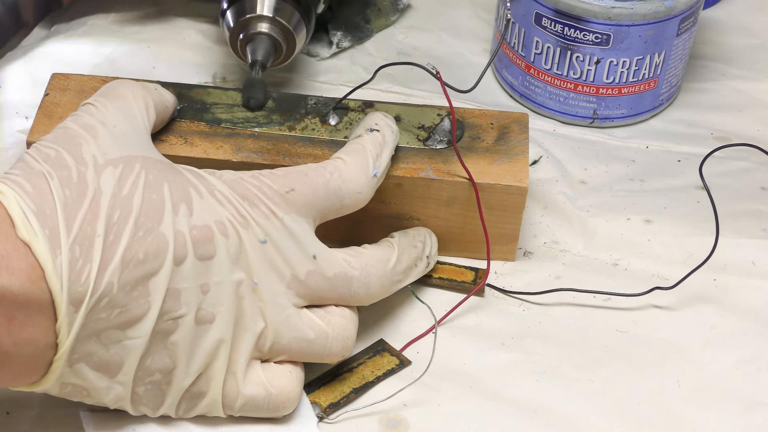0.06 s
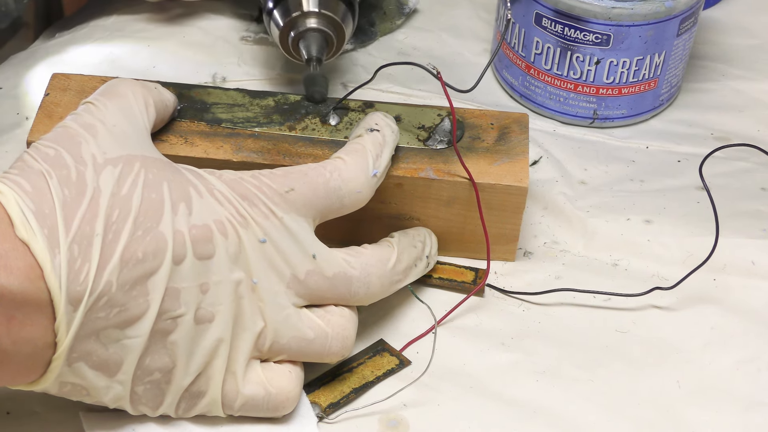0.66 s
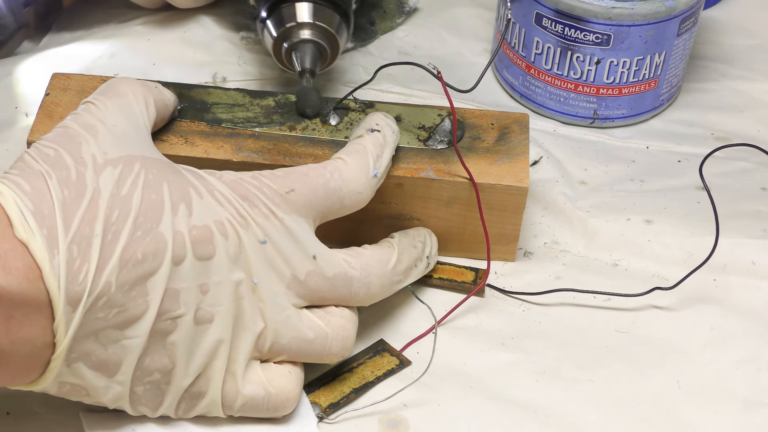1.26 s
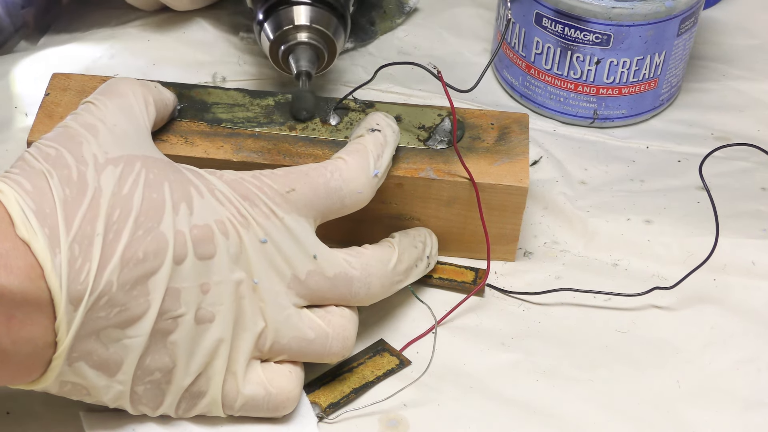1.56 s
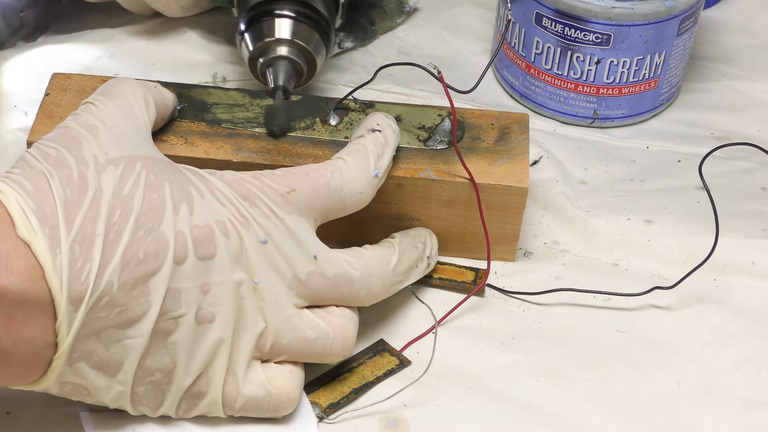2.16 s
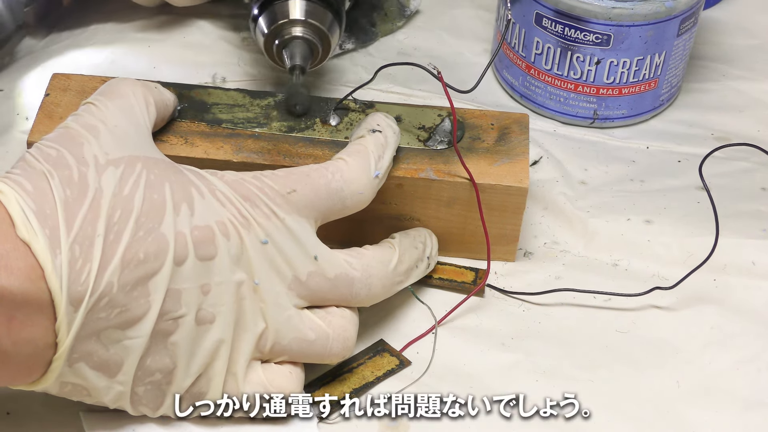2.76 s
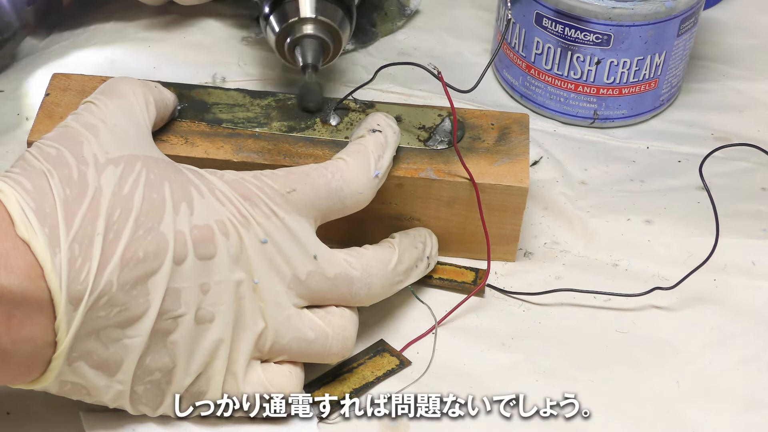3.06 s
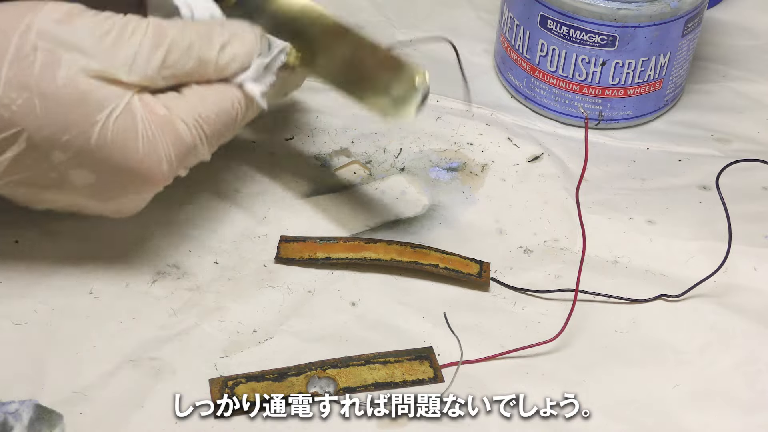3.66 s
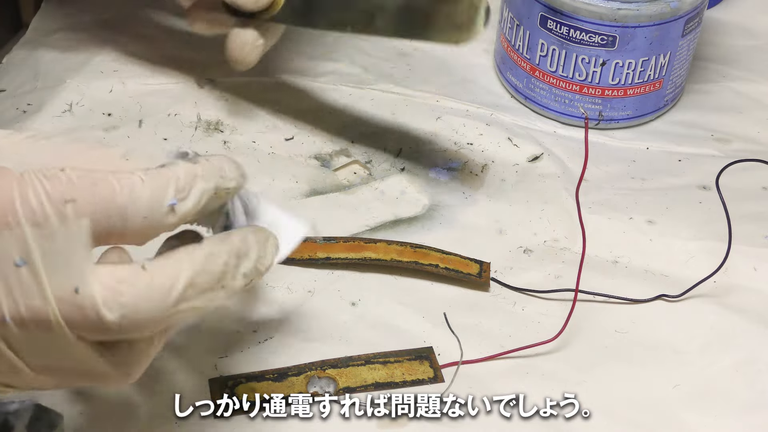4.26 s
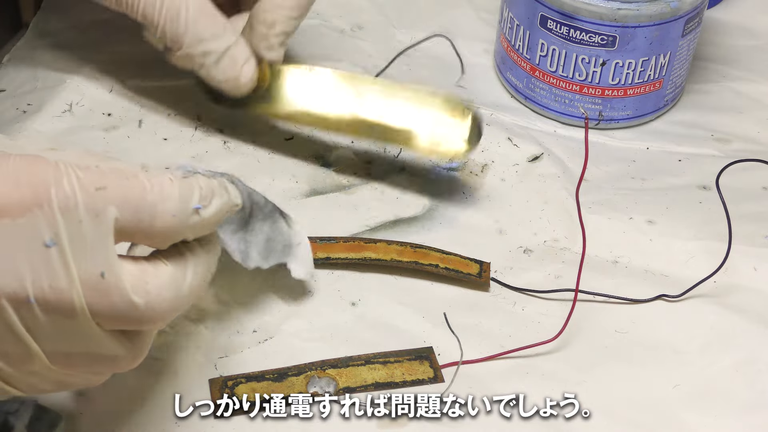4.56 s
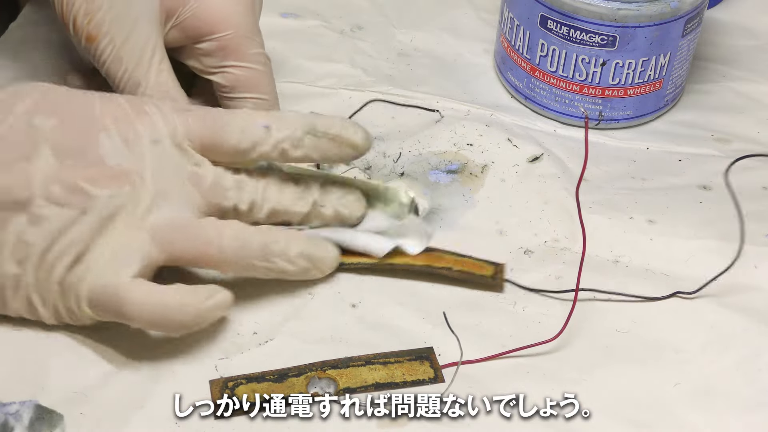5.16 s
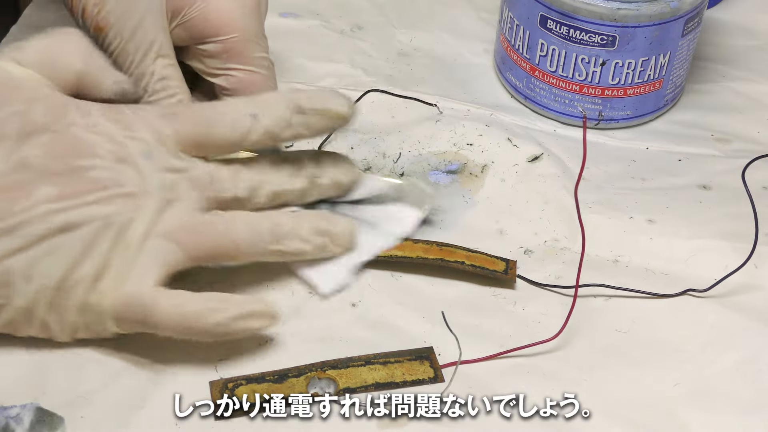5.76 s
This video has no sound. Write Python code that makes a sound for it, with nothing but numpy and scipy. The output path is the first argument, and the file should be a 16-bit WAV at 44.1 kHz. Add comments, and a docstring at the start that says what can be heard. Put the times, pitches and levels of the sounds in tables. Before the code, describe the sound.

From the start, a hand-held rotary tool runs close by, polishing a small metal plate. A steady motor hum and high whine sit over rushing air and the bright hiss of the polishing tip, with a thin, very high whistle flickering in and out. The pitch sags slightly from about 1 second as the tool takes load, and the tip drags with a faint low drone near 2.2 seconds. At about 3.15 seconds the tool cuts off abruptly, leaving quiet workshop background noise. Faint, short cloth wipes and rubbery scuffs follow at uneven intervals, busiest between 4.1 and 5.5 seconds. Sticky rubber gloves let go with small, sharp pops and crackles, clearest around 4.1, 4.6 to 4.7, 5.05 and 5.65 seconds. A soft low rumble of a passing hand swells around 5.8 seconds, and one last wipe with little snaps comes near 6 seconds.

```python
"""Polishing and wiping a metal plate

A geared hand-held rotary tool spins a polishing bob on a small plate: tones locked to the rotor whine
over the rush of cooling air. The tool sound ends abruptly, leaving a quiet workshop where gloved hands
pick up the plate and wipe it with a cloth: friction scuffs, rubber snaps and a low rumble of handling."""
import sys
import numpy as np
from scipy import signal
from scipy.fft import rfft, irfft
from scipy.io import wavfile

SR = 44100
rng = np.random.default_rng(int(sys.argv[2]) if len(sys.argv) > 2 else 0)


def put_to_file(sound):
    """Save the sound as 16-bit audio at rate SR, in the file named by the first command-line argument."""
    columns = np.atleast_2d(sound).T  # one column per channel
    safe = np.clip(columns, -1, 1)
    whole_steps = np.round(safe * 32767)
    wavfile.write(sys.argv[1], SR, whole_steps.astype(np.int16))


N = 264580
TIME = np.arange(N) / SR
BIN_HZ = np.maximum(np.arange(N // 2 + 1) * SR / N, 1)
TOOL_ENDS_S = 3.1502

# Motor speed, sagging under load. Each row: time in seconds, turns per second.
MOTOR_SPEED = [(0, 495.1), (.3, 494), (.57, 493.9), (.72, 492.9), (1.05, 492.3), (1.2, 486.2), (1.4, 483.6),
               (1.75, 480.3), (2.4, 480.2), (2.85, 478.4), (3.14, 478.1)]
# The whine and its octave. Each row: time in seconds, level in dB.
WHINE_LEVEL = [(0, -49.5), (.6, -57.5), (1.02, -56), (1.12, -49.5), (1.4, -50), (1.55, -56.5), (1.8, -51.5),
               (3.14, -52)]
OCTAVE_LEVEL = [(0, -56.5), (.6, -55.5), (.8, -53.5), (1.02, -55.5), (1.12, -52), (2.35, -54), (2.6, -60),
                (2.82, -52.5), (3.14, -55.5)]
# Spells of thin whistling. Each row: start and end in seconds, level in dB, flicker in dB.
WHISTLE_SPELLS = [(-.05, .09, -57, 2), (.3, 1.08, -57, 0), (1.17, 2.48, -60.5, 2.5), (2.48, 2.78, -55.5, 1),
                  (2.78, 3.2, -52.5, 1.8)]
# Weak partials of motor and chuck. Each row: multiple of that part's speed, base level in dB.
MOTOR_PARTIALS = [(9.75, -74), (10.4, -71), (11.4, -78), (12, -69), (16, -69.5), (16.7, -69), (20, -67),
                  (24, -73), (24.94, -73), (28.82, -84)]
CHUCK_PARTIALS = [(2, -102), (3, -82), (4, -82), (6, -79), (7, -84.5), (8, -85.5), (10, -91)]
# Hiss of the pressed bob. Each row: time in seconds, level in dB.
BOB_LEVEL = [(0, -52), (.3, -54), (1.05, -51.5), (1.25, -55.5), (1.9, -52.3), (2.4, -53.5), (2.6, -51),
             (2.87, -50), (3.12, -53.5)]
# The bob drags. Each row: centre in seconds, level in dB, half length in seconds.
BOB_DRAGS = [(.94, -75, .07), (2.219, -58.5, 0.037), (2.434, -65.5, .04)]
# Wipes. Each row: peak time in seconds, cloth hiss in dB, nominal half length in seconds, rasp in dB.
WIPES = [(3.183, -73, .006, -75.5), (3.555, -78, .03, -82), (3.72, -71, .021, -79), (4.155, -65, .012, -65),
         (4.354, -67.5, .017, -74), (4.673, -68, .024, -68), (4.837, -66, .02, -63.5),
         (4.945, -74, .025, -65), (5.069, -74, .019, -65), (5.17, -73, .022, -63), (5.231, -64, .017, -58),
         (5.362, -70.5, .055, -72), (5.515, -69, .03, -67), (5.833, -70.5, .034, -71),
         (5.98, -61, .023, -60.5)]
# Sticky gloves leave the plate. Each row: start in seconds, pop level in dB, pop pitch in Hz,
# crackle base level in dB, crackle pitch in Hz.
GLOVE_SNAPS = [(4.102, -44, 2270, -56, 8500), (4.1585, -55, 1950, -52, 10400),
               (4.4137, -60, 2190, -65, 7500), (4.6205, -46, 2500, -63, 10000),
               (4.6503, -39.5, 2000, -65, 11500), (4.703, -40.5, 2010, -58, 10300),
               (4.8554, -48, 1900, -74, 9000), (4.9156, -53, 2030, -56.5, 9400),
               (5.051, -42.5, 2450, -76, 6000), (5.07, -46, 2800, -71, 7000),
               (5.224, -51, 2800, -53, 12800), (5.292, -55, 1770, -62.5, 9500),
               (5.6508, -38, 2780, -65, 10500), (5.972, -51, 1950, -58, 7500),
               (5.9904, -50, 2180, -54, 9500)]
# Rumble of the passing hand. Each row: time in seconds, level in dB.
RUMBLE_LEVEL = [(5.70, -95), (5.742, -55), (5.785, -51), (5.83, -57), (5.86, -52), (5.895, -50.5),
                (5.92, -72), (6, -64)]

# Noise spectra. Each row: frequency in Hz, relative spectral density in dB.
COOLING_SPECTRUM = [(30, -31), (100, -15), (320, -16), (500, -10), (820, -8.5), (1050, 0), (1700, 1.5),
                    (2900, -2), (4400, -1.5), (5300, -12), (6300, -4), (7500, -8.5), (12000, -6),
                    (13700, -13.5)]
BOB_SPECTRUM = [(500, -31), (1500, -13), (3000, -5), (4500, 2), (6200, 1.5), (7500, -0.5), (11500, 1),
                (13000, -0.5), (13700, -6.5), (16000, -4)]
BLOCK_SPECTRUM = [(60, -30), (135, -13), (180, 4.5), (220, -3.5), (280, -6), (360, -18), (700, -50)]
WORKSHOP_SPECTRUM = [(25, -24), (50, -23), (70, -10.5), (170, -8.5), (260, -2.5), (400, -4), (600, -9.5),
                     (780, -11.5), (1100, -6.5), (2200, -9.5), (3200, -13.5), (5000, -29), (11000, -36.5),
                     (16000, -47)]
CLOTH_SPECTRUM = [(300, -29), (1500, 1), (2500, 3), (4700, 2), (6000, -1.5), (8000, -3), (10800, 3.5),
                  (13000, 0.5), (16000, -9)]
GLOVE_SPECTRUM = [(300, -21), (1200, -12), (2100, -2), (2800, -7.5), (4000, -14), (8000, -27), (16000, -47)]
RUMBLE_SPECTRUM = [(20, -10), (50, -9), (80, 3.5), (120, 1.5), (250, -7.5), (400, -27), (900, -40),
                   (3000, -70)]
# Resonances. Each row: centre in Hz, bandwidth in Hz, lift in dB.
HOUSING_MODES = [(446.6, 19, 9.5), (717, 53, 7), (1403, 63, 9), (1564, 74, 10.5), (2404, 220, 6),
                 (2603, 21, 11), (3970, 560, 4), (4980, 54, 10.5), (6140, 140, 4.5), (6780, 110, 5)]
WORKSHOP_MODES = [(70, 15, 5), (97.5, 19, 11.5), (145, 27, 13.5), (232.5, 49, 8), (385, 48, 3),
                  (1220, 130, 0.5)]
PLATE_MODES = [(2030, 160, 4), (2660, 160, 3), (4590, 90, 4), (10600, 900, 0.5)]
# Stereo width of the first part as heard, narrowing to mono near 7.5 kHz.
# Each row: frequency in Hz, side minus mid in dB, left minus right in dB.
FIRST_PART_STEREO = [(60, 3, -9), (200, -7, -3.5), (380, -10.5, -1), (1000, -12, -0.5), (2400, -14.5, -1),
                     (4700, -9, 0.3), (7500, -44, -0.5), (11700, -10.5, .5)]
# Stereo width of the second part as heard, with the same columns.
ROOM_STEREO = [(100, -16, -2.5), (380, -13, 0), (1300, -9, 3), (2400, -7.5, 1.5), (8000, -15, .3)]
HAND_STEREO = [(60, 2.5, -2), (400, -2, -1)]


def from_db(db):
    """Amplitude grows tenfold for every 20 dB."""
    return 10 ** (np.asarray(db) / 20)


def unit_rms(x):
    """Normalisation to unit mean power."""
    return x / np.sqrt(np.mean(x ** 2) + 1e-20)


def over_time(rows):
    """Linear interpolation of a curve at every sample."""
    return np.interp(TIME, *np.transpose(rows))


def over_bins(hz, db):
    """Interpolation of a spectrum in log frequency."""
    return np.interp(np.log(BIN_HZ), np.log(hz), db)


def drift(corner_hz):
    """Random fluctuation: low-passed noise of unit rms."""
    return unit_rms(irfft(rfft(rng.standard_normal(N)) / (1 + (BIN_HZ / corner_hz) ** 2), N))


def swell(centre_s, half_s):
    """A Gaussian envelope whose half length is one standard deviation."""
    return np.exp(-.5 * ((TIME - centre_s) / half_s) ** 2)


def pan(db):
    """Channel gains for a level difference, left minus right."""
    return from_db(db / 2 * np.array([[1], [-1]]))


def noise(spectrum, image, modes=(), grain_db=0):
    """Source and filter: resonances colour stereo noise of unit rms; grain breaks it into tiny slips."""
    lift_db = sum(db / (1 + (2 * (BIN_HZ - hz) / width) ** 2) for hz, width, db in modes)
    colour = from_db(over_bins(*np.transpose(spectrum)) + lift_db)
    slips = rng.standard_normal((2, N)) * from_db(grain_db * np.clip(drift(330), -2.5, 2.5))
    mid, side = rfft(slips) * colour
    image_hz, side_db, left_db = np.transpose(image)
    side *= from_db(over_bins(image_hz, side_db))
    balance = pan(over_bins(image_hz, left_db))
    return unit_rms(irfft(np.array([mid + side, mid - side]) * balance, N))


def tone(phase, db, flutter_db=0, spread_rad=.3, rough_rad=.1):
    """Phase modulation: roughness smears a partial, and reflections shift it between the ears."""
    ear_shift = spread_rad * drift(1.8) * np.array([[1], [-1]])
    wobble = rough_rad * drift(60) + rng.uniform(0, 2 * np.pi)
    return np.sqrt(2) * from_db(db + flutter_db * drift(6.7)) * np.sin(phase + ear_shift + wobble)


def motor_hum(angle, load):
    """Rotor unbalance forces one vibration per turn, weaker under load."""
    return tone(angle, -60.5 - 7 * load, flutter_db=.2, spread_rad=.36, rough_rad=.044)


def motor_whine(angle, load):
    """Harmonics 4 and 8 of the rotation, smeared by rotor rattle that steadies under load."""
    rattle = .2 - .133 * load
    whine = tone(4 * angle, over_time(WHINE_LEVEL), flutter_db=.7, spread_rad=.28, rough_rad=rattle)
    octave = tone(8 * angle, over_time(OCTAVE_LEVEL), flutter_db=.9, spread_rad=.091, rough_rad=2 * rattle)
    return whine * pan(1.5) + octave


def motor_whistle(angle, fade_s=.04):
    """Harmonic 25 of the rotation sounds in flickering, soft-edged spells."""
    flicker, envelope = drift(13), np.zeros(N)
    for start, end, db, flicker_db in WHISTLE_SPELLS:
        spell = np.clip(np.minimum(TIME - start, end - TIME) / fade_s + .5, 0, 1)
        envelope += spell * from_db(db + flicker_db * flicker)
    return envelope * tone(25 * angle, 0, spread_rad=.2, rough_rad=.13)


def motor_overtones(angle, flutter_db=3.4):
    """Weak partials are phase-locked to the rotor while their levels flutter independently."""
    return sum(np.sqrt(2) * from_db(db + flutter_db * drift(12)) * np.sin(order * angle)
               for order, db in MOTOR_PARTIALS)


def chuck_shake(angle, load, gear_ratio=17.3):
    """Forced vibration: the geared-down chuck shakes the tool at its harmonics, less under load."""
    shake = np.zeros((2, N))
    for order, db in CHUCK_PARTIALS:
        ear_phase = rng.normal(0, .47, (2, 1))
        shake += np.sqrt(2) * from_db(db) * np.sin(order * angle / gear_ratio + ear_phase)
    return from_db(-1.5 * load + 1.6 * drift(5.1)) * shake * pan(-5.5)


def motor():
    """The rotor angle, the integral of speed, sets the phase of every tool tone."""
    speed = over_time(MOTOR_SPEED)
    load = (speed.max() - speed) / np.ptp(speed)   # 0 running light, 1 at full load
    angle = 2 * np.pi * np.cumsum(speed + .22 * drift(27.6)) / SR
    return (motor_hum(angle, load) + motor_whine(angle, load) + motor_whistle(angle)
            + motor_overtones(angle) + chuck_shake(angle, load))


def cooling_air(db=-47):
    """Broadband flow noise is coloured by the resonances of the housing."""
    return from_db(db) * noise(COOLING_SPECTRUM, FIRST_PART_STEREO, HOUSING_MODES)


def bob_hiss(wander_db=.5):
    """Sliding friction hisses with the pressure of a slightly unsteady hand."""
    level_db = over_time(BOB_LEVEL) + wander_db * drift(4)
    return from_db(level_db) * noise(BOB_SPECTRUM, FIRST_PART_STEREO, grain_db=1)


def block_drone():
    """The dragging bob excites a low resonance of the wooden block under the plate."""
    drag = sum(from_db(db) * swell(s, half_s) for s, db, half_s in BOB_DRAGS)
    return drag * noise(BLOCK_SPECTRUM, FIRST_PART_STEREO)


def workshop(db=-62):
    """Room modes colour a steady background noise."""
    return from_db(db) * noise(WORKSHOP_SPECTRUM, ROOM_STEREO, WORKSHOP_MODES)


def stroke(peak_s, half_s):
    """An asymmetric envelope: a wipe starts quickly and trails off."""
    return swell(peak_s, half_s * np.where(TIME < peak_s, .75, 1.2))


def cloth_hiss(catch_db=1.8):
    """Stick-slip friction: fibres catch and hiss in each wipe, and brush lightly in between."""
    wiping = sum(from_db(db) * stroke(s, half_s) for s, db, half_s, _ in WIPES)
    brushing = from_db(-80 + 1.5 * np.clip(drift(11), -2, 2))
    catching = from_db(catch_db * drift(45))
    fibres = noise(CLOTH_SPECTRUM, ROOM_STEREO, PLATE_MODES, grain_db=1)
    return catching * np.hypot(wiping, brushing) * fibres


def glove_rasp(grip):
    """Gripping rubber slips in coarse grains that faintly excite the plate's modes."""
    return grip * noise(GLOVE_SPECTRUM, ROOM_STEREO, PLATE_MODES, grain_db=5.5)


def faint_snaps(grip, per_s=7, scatter_db=2):
    """Random releases, likelier where the glove grips; rows as in GLOVE_SNAPS."""
    count = round(per_s * (N / SR - TOOL_ENDS_S))
    when, pop, pitch, crackle = rng.random((count, 4)).T
    chance = np.cumsum(np.sqrt(grip))
    start_s = np.interp(when, chance / chance[-1], TIME)
    pop_db = -55 + scatter_db * (2 * pop - 1)
    crackle_db = -68.5 + scatter_db * (2 * crackle - 1)
    shift = 2 ** (pitch - .5)   # up to half an octave either way
    return list(zip(start_s, pop_db, 2100 * shift, crackle_db, 8800 * shift))


def glove_snaps(grip, pop_rise_cycles=.57, crackle_rise_s=.0005, crackle_lift_db=3):
    """Adhesion fails: rubber lets go with a heavily damped pop and a bright tearing crackle."""
    out, t = np.zeros(N), TIME[:SR // 30]
    for s, pop_db, pop_hz, crackle_db, crackle_hz in list(GLOVE_SNAPS) + faint_snaps(grip):
        age = t * pop_hz / pop_rise_cycles
        pop = age * np.exp(1 - age) * np.sin(2 * np.pi * pop_hz * t)
        band = signal.butter(2, [.68 * crackle_hz, 1.15 * crackle_hz], "band", fs=SR, output="sos")
        bright = unit_rms(signal.sosfilt(band, rng.standard_normal(len(t))))
        crackle = t / crackle_rise_s * np.exp(1 - t / crackle_rise_s) * bright
        snap = from_db(pop_db) * pop + from_db(crackle_db + crackle_lift_db) * crackle
        at = min(round(s * SR), N - 1)
        out[at:at + len(t)] += snap[:N - at]
    return out


def reverberation(x, t60_s=.092, db=-4):
    """Diffuse reflections form an exponentially decaying tail, different at each ear."""
    t = TIME[:SR // 3]
    mid, side = rng.standard_normal((2, len(t))) * from_db(-60 * t / t60_s) * (t > .002)
    tail = unit_rms(np.array([mid + .5 * side, mid - .5 * side])) / np.sqrt(len(t))
    return from_db(db) * signal.fftconvolve(x[None], tail, axes=1)[:, :N]


def plate_squeak(hz=4650):
    """Friction-excited vibration: the rubbed plate sings once."""
    return swell(centre_s=5.0, half_s=.03) * tone(2 * np.pi * hz * TIME, db=-82, rough_rad=.4)


def hand_rumble():
    """Low-frequency noise swells as the hand sweeps by."""
    return from_db(over_time(RUMBLE_LEVEL)) * noise(RUMBLE_SPECTRUM, HAND_STEREO)


def scene():
    """Sources superpose: first the running tool, then hands and cloth in the quiet room."""
    tool = motor() + cooling_air() + bob_hiss() + block_drone()
    grip = sum(from_db(db) * stroke(s, half_s) for s, _, half_s, db in WIPES)
    handling = hand_rumble() + workshop() + cloth_hiss() + glove_rasp(grip) + plate_squeak()
    snaps = glove_snaps(grip)
    running = np.clip((TOOL_ENDS_S - TIME) * 1000, 0, 1)   # 1 ms crossfade
    return running * tool + (1 - running) * (handling + snaps + reverberation(snaps))


def record(dry, cutoff_hz=15780):
    """An elliptic low-pass filter cuts the highest treble steeply."""
    return signal.sosfilt(signal.ellip(12, .1, 70, cutoff_hz, fs=SR, output="sos"), dry)


dry = scene()
out = record(dry)
put_to_file(out)
```